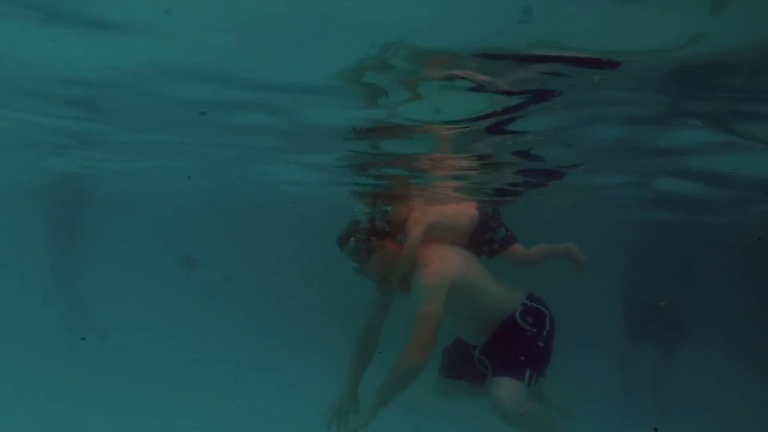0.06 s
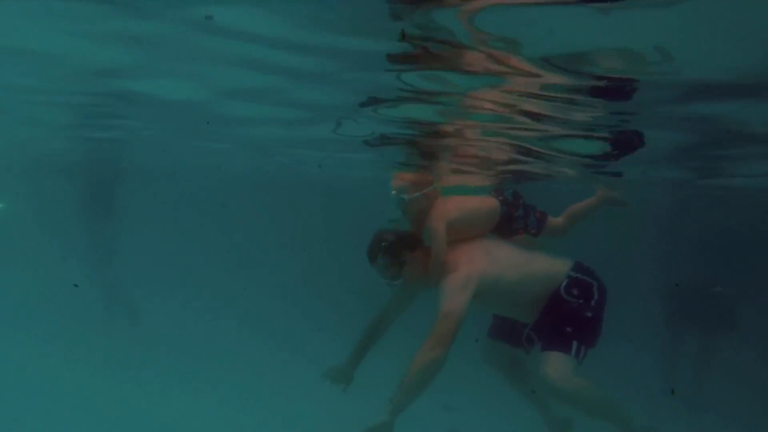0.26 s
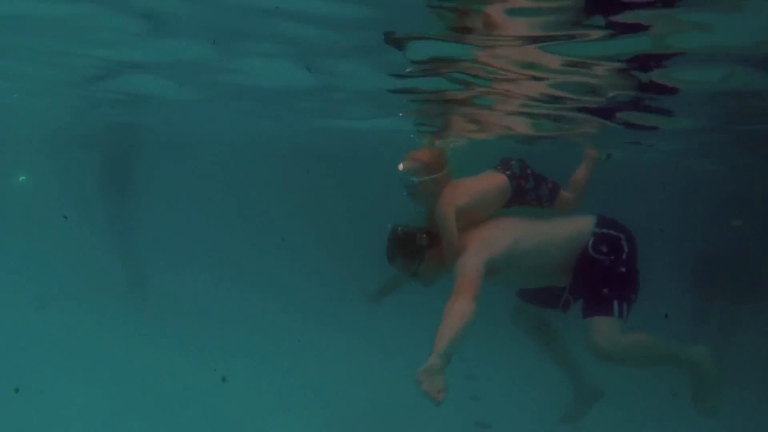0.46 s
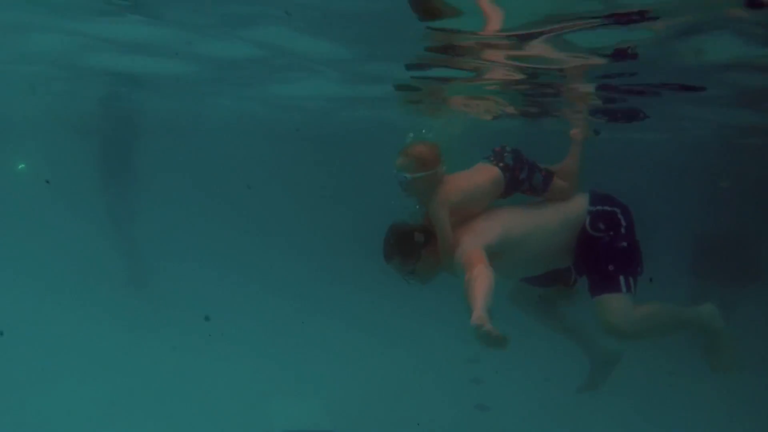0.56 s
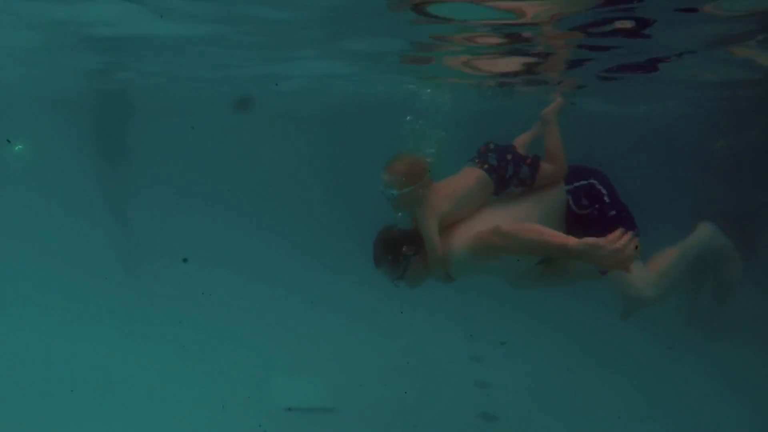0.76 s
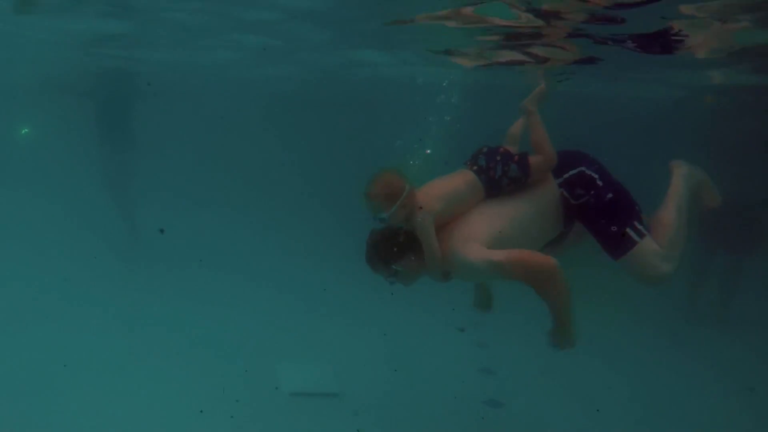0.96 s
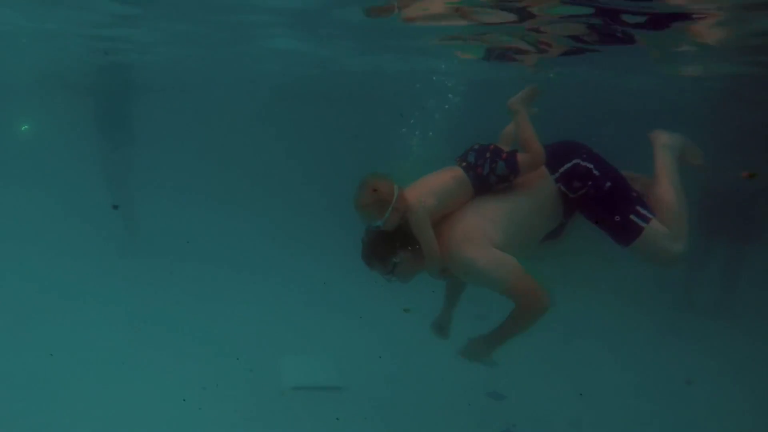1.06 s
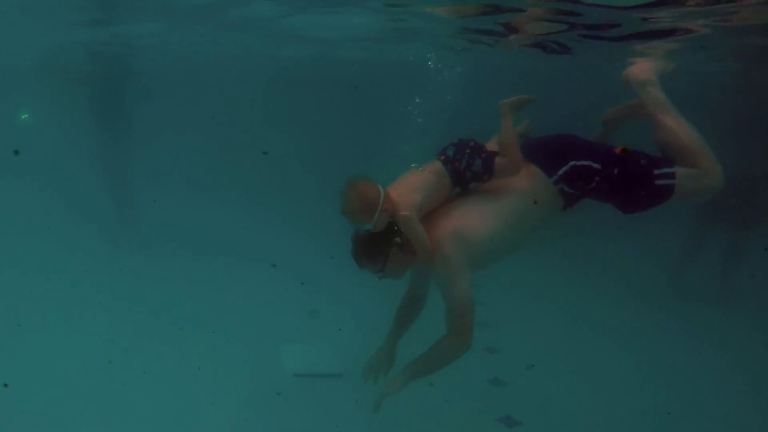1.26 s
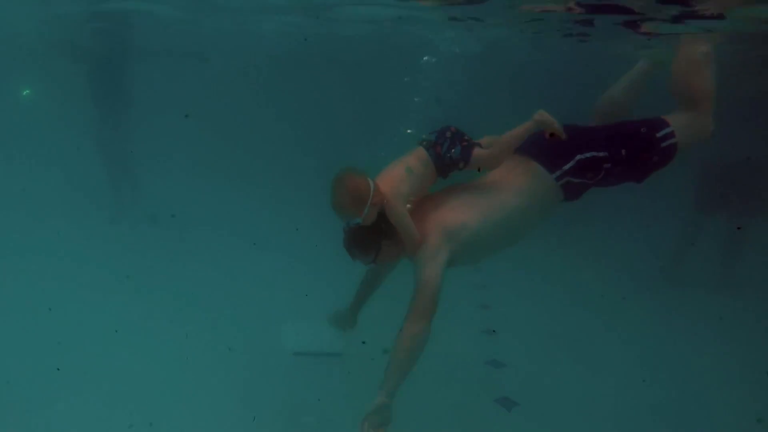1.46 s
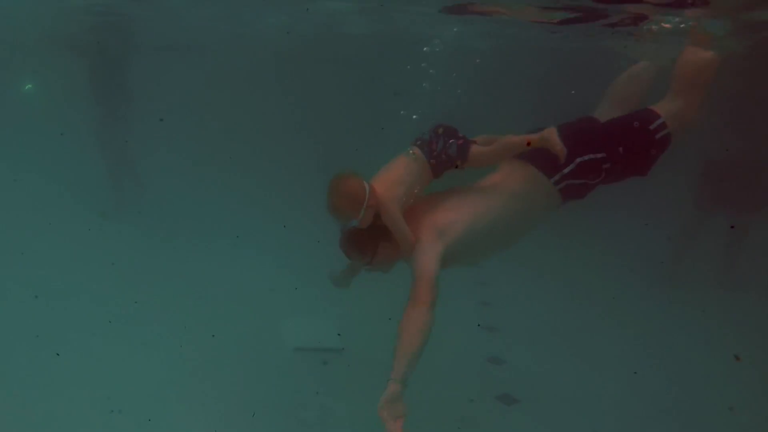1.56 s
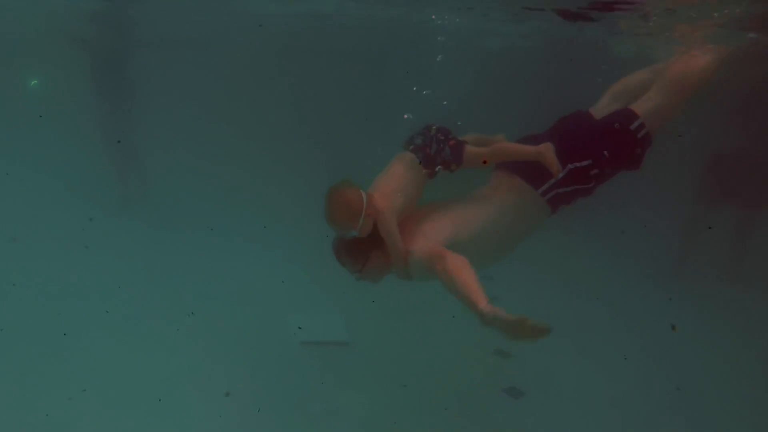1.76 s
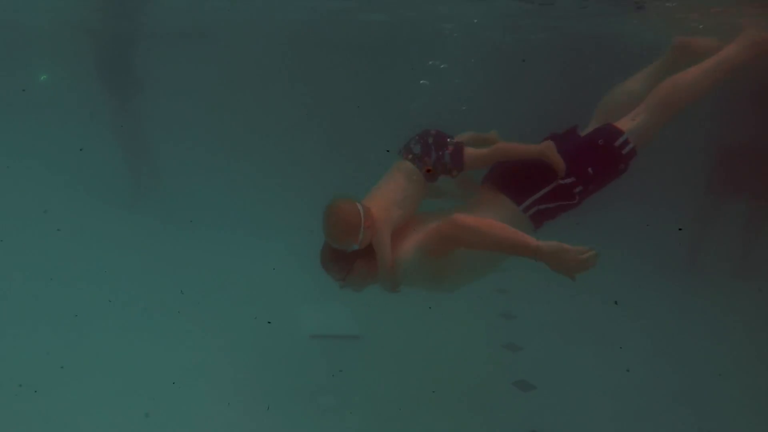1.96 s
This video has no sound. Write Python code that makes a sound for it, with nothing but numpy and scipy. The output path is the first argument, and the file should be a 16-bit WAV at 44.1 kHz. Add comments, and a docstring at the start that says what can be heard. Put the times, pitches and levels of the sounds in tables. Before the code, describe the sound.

Muffled underwater pool gurgling as swimmers pass, with deep rumble, glugging bubbles and one sharp click

```python
"""Two swimmers pass a sealed microphone housing under water in a pool. Stirred water rumbles throughout,
bubbles gurgle in the housing's hollow and fine ones fizz, all as filtered noise or random swarms.
Early on a large pocket of air throbs, a decaying sine like the nearer glugs and plinks that run on.
At 0.5 s something hard ticks sharply on the housing (noise crack, ringing modes), then weakly again.
Fainter contacts follow; near 1.6 s the fizz is strongest and a loud glug sounds."""
import sys
import numpy as np
from scipy import signal
from scipy.fft import rfft, irfft, next_fast_len
from scipy.io import wavfile

SR = 44100
rng = np.random.default_rng(int(sys.argv[2]) if len(sys.argv) > 2 else 0)


def waveform_to_disk(signal):
    """Save audio, clipped to [-1, 1], as 16-bit WAV at the path in sys.argv[1]."""
    frames = np.transpose(np.atleast_2d(signal))
    scaled = np.clip(frames, -1, 1) * 32767
    samples = np.round(scaled).astype(np.int16)
    wavfile.write(sys.argv[1], SR, samples)


N = 88861


def amp(db):
    """Decibels to gain."""
    return 10 ** (np.asarray(db) / 20)


def unit(x):
    """Scale to rms 1."""
    return x / np.sqrt(np.mean(x ** 2) + 1e-20)


def curve(rows):
    """Interpolate (seconds, value) rows to one value per sample."""
    return np.interp(np.arange(N) / SR, *np.transpose(rows))


def colour(x, points):
    """Causal minimum-phase filter through (Hz, dB) points, by folding the cepstrum."""
    m = 2 * next_fast_len(len(x) // 2 + 8192)
    hz, db = np.transpose(points)
    log_hz = np.log(np.fft.rfftfreq(m, 1 / SR) + 1)
    gain = amp(np.interp(log_hz, np.log(hz), db))
    cepstrum = irfft(np.log(gain), m)
    cepstrum[1:m // 2] *= 2
    cepstrum[m // 2 + 1:] = 0
    response = np.exp(rfft(cepstrum))
    return irfft(rfft(x, m) * response, m)[:len(x)]


def coloured_noise(size, points):
    """White noise filtered through (Hz, dB) points, at rms 1."""
    return unit(colour(rng.standard_normal(size), points))


def add(out, start_s, sound):
    """Mix a sound in at start_s, cut at the end of out."""
    i = max(0, round(start_s * SR))
    out[i:i + len(sound)] += sound[:max(0, N - i)]


def bubble(hz, swell_s, t60_s):
    """A pulsating volume of air: it swells, then dies away at a fixed pitch."""
    t = np.arange(SR // 2) / SR
    swell = np.sin(np.pi / 2 * np.minimum(t / swell_s, 1))
    decay = amp(-60 * np.maximum(t - swell_s, 0) / t60_s)
    return swell * decay * np.sin(2 * np.pi * hz * t)


def swarm(count, hz, spread, cycles, scatter_db, size, rise=0):
    """Bubbles of random time, pitch and strength; each falls 60 dB in `cycles` and climbs if rise > 0."""
    when = rng.random(count)
    pitch = rng.standard_normal(count)
    strength = np.minimum(rng.exponential(size=count), 3)
    bubble_hz = np.minimum(hz * np.exp(spread * pitch), SR / 3)
    turns = bubble_hz[:, None] * np.arange(size) / SR
    decay = amp(scatter_db * strength[:, None] - 60 * turns / cycles)
    onset = 1 - np.exp(-turns)
    waves = decay * onset * np.sin(2 * np.pi * turns * (1 + rise * turns / cycles))
    at = (when * N).astype(int)[:, None] + np.arange(size)
    return unit(np.bincount(at.ravel() % N, waves.ravel(), N))  # tails wrap to the start


def near_bubbles():
    """Air volumes pulsating close by: throbs and glugs muffled by the housing's hollow, and clear plinks."""
    # Deep air pockets and eddies. Each row: start in seconds, pitch in Hz, level in dB before
    # muffling, swell in seconds, t60 in seconds.
    throbs = [(0.084, 83.8, -30.5, 0.079, 0.38), (0.102, 141, -39.5, 0.0049, 0.081),
              (0.469, 43.3, -34.5, 0.046, 0.48), (0.918, 44.2, -34.5, 0.024, 0.28),
              (0.991, 25.5, -33.5, 0.067, 0.28), (1.11, 56.3, -35, 0.0223, 0.21),
              (1.653, 52.6, -36, 0.018, 0.062), (1.881, 47, -31, 0.023, 0.059)]
    # Mid-sized bubbles. Each row: as for the throbs.
    glugs = [(.048, 550, -37, 0.017, 0.053), (.139, 570, -37, 0.0031, 0.067),
             (.172, 609, -33, 0.0015, 0.054), (0.203, 590, -40, 0.002, 0.024),
             (.306, 577, -39.5, 0.011, 0.035), (.484, 615, -31, 0.0022, 0.026),
             (.570, 595, -36, 0.0078, 0.075), (.599, 578, -33, 0.0014, 0.085),
             (0.67, 550, -31, 0.0017, 0.034), (.709, 574, -33.5, 0.003, 0.047),
             (.739, 514, -28.5, 0.003, 0.017), (.858, 610, -37.5, 0.0021, 0.019),
             (.909, 599, -30, 0.0095, 0.067), (0.963, 561, -33.5, 0.00098, 0.1),
             (1.094, 610, -34, 0.0015, 0.05), (1.146, 454, -39.5, 0.0095, 0.09),
             (1.227, 556, -30.5, 0.0035, 0.035), (1.640, 553, -27, 0.0048, 0.13),
             (1.672, 544, -35, 0.0053, 0.079), (1.706, 589, -37, 0.0083, 0.061)]
    # Small bubbles. Each row: start in seconds, pitch in Hz, level in dB.
    plinks = [(0.106, 3640, -46), (.367, 2330, -46), (0.407, 2730, -45.5), (0.476, 1410, -51),
              (.676, 3930, -47), (0.727, 1780, -47.5), (0.771, 3380, -50), (0.787, 6800, -54.5),
              (.983, 3370, -53), (1.014, 3850, -43), (1.204, 2330, -50.5), (1.456, 3220, -51),
              (1.458, 2730, -45.5), (1.479, 2280, -49), (1.514, 2430, -46), (1.6, 2400, -45.5),
              (1.613, 1380, -49), (1.638, 1760, -46.5), (1.660, 10000, -58.5), (1.662, 3850, -49),
              (1.677, 1730, -52), (1.719, 3220, -46), (1.881, 1840, -42.5), (1.938, 2430, -41)]
    hollow_edge_hz = 704
    plink_swell_s, plink_t60_s = 0.0015, 0.024

    out = np.zeros(N)
    for start_s, hz, db, swell_s, t60_s in throbs + glugs:
        add(out, start_s, amp(db) * bubble(hz, swell_s, t60_s))
    lowpass = signal.butter(8, hollow_edge_hz, fs=SR, output="sos")
    out = signal.sosfiltfilt(lowpass, out)
    for start_s, hz, db in plinks:
        add(out, start_s, amp(db) * bubble(hz, plink_swell_s, plink_t60_s))
    return out


def clicks():
    """Hard contacts crack and ring the housing, low modes building up last; the pool echoes diffusely."""
    # Contacts. Each row: start in seconds, level in dB, crack level in dB relative to that.
    contacts = [(.5164, -20.5, -15), (.5405, -42, -0.5), (.7065, -54, 1), (1.697, -55, 1),
                (1.9005, -44, -9)]
    # Housing modes. Each row: frequency in Hz, relative level in dB, t60 in seconds.
    modes = [(600, -5, 0.018), (1360, -7, 0.026), (1820, -5, 0.016), (2406, -6, 0.016), (2537, -2, 0.017),
             (3320, -6, 0.028), (3500, 0.5, 0.014), (3790, 3, 0.019), (4600, -8.5, 0.015),
             (5470, -21, 0.034), (7250, -14.5, 0.013), (11280, -40, 0.02)]
    # Crack spectrum. Each row: frequency in Hz, relative level in dB.
    crack_tone = [(900, -5), (2000, -10), (3800, -3), (6000, -5), (10000, -5), (12000, -17), (16000, -12)]
    # Echo spectrum. Each row: frequency in Hz, relative level in dB.
    pool_tone = [(700, -26), (1400, -1.5), (2500, 2), (4200, 0.5), (5400, -9.5), (10000, -24), (13000, -30)]
    crack_t60_s, ring_up_cycles = 0.017, 1.3
    pool_db, pool_swell_s = -23, 0.014

    out = np.zeros(N)
    t = np.arange(SR // 5) / SR
    pool_swell = (t / pool_swell_s * np.exp(1 - t / pool_swell_s)) ** 2
    for start_s, db, crack_db in contacts:
        ring = np.zeros(len(t))
        for hz, mode_db, t60_s in modes:
            decay = amp(mode_db - 60 * t / t60_s)
            build_up = 1 - np.exp(-(t * hz / ring_up_cycles) ** 2)
            ring += decay * build_up * np.sin(2 * np.pi * (hz * t + rng.random()))
        crack = amp(crack_db - 60 * t / crack_t60_s) * coloured_noise(len(t), crack_tone)
        echoes = amp(pool_db) * pool_swell * coloured_noise(len(t), pool_tone)
        add(out, start_s, amp(db) * (ring + crack + echoes))
    return out


def gurgle():
    """Churned bubbles, each a short strand rising in pitch, heard through the hollow of the housing."""
    # Churning of the bubbles. Each row: time in seconds, level in dB.
    churn_level = [(0, -45), (.12, -50.5), (.33, -44), (.41, -50.5), (.58, -47.5), (.76, -46.5), (.88, -48),
                   (1.03, -50), (1.13, -46.5), (1.25, -47), (1.3, -50), (1.45, -54.5), (1.52, -46.5),
                   (1.6, -48.5), (1.71, -46), (1.82, -50.5), (2.01, -52)]
    # Hollow resonance. Each row: frequency in Hz, relative gain in dB.
    hollow_tone = [(150, -39.5), (300, -21.5), (380, -12.5), (480, -10.5), (555, -2.5), (610, -0.5),
                   (670, -7.5), (760, -29.5), (1000, -47), (2000, -70)]
    bubbles = swarm(count=800, hz=510, spread=0.3, cycles=22, scatter_db=1.2, size=2600, rise=0.1)
    return amp(curve(churn_level)) * unit(colour(bubbles, hollow_tone))


def fizz():
    """Fine bubbles and hiss through the shell's resonances, with fewer, longer-ringing blips closer by."""
    # Strength of the fizz. Each row: time in seconds, level in dB.
    fizz_level = [(0, -60), (.25, -59.5), (.45, -58.5), (.7, -59), (.92, -56), (1.1, -61.5), (1.4, -63),
                  (1.52, -60), (1.62, -53.5), (1.72, -54), (1.83, -56.5), (2.01, -58.5)]
    # Shell resonances. Each row: frequency in Hz, relative gain in dB.
    shell_tone = [(700, -51), (1150, -14.5), (1370, 4.5), (1600, -14), (1850, 1.5), (2070, -37.5),
                  (2370, 7), (2900, -20), (3300, 1.5), (3520, -8), (3830, 8), (4400, 0), (4800, -7.5),
                  (5400, 0.5), (6000, -12), (7300, -21), (9300, -35), (10200, 0.5), (11000, -75),
                  (16000, -33)]
    # Filter on the blips. Each row: frequency in Hz, relative gain in dB.
    blip_tone = [(900, -31), (1400, 1), (4200, -1.5), (6000, -8), (12000, -17)]
    hiss_db, blip_db = -8, -5.5  # hiss re bubble swarm, blips re fine fizz

    bubbles = swarm(count=3000, hz=3450, spread=0.692, cycles=11, scatter_db=2.2, size=600)
    blips = swarm(count=600, hz=2600, spread=0.45, cycles=40, scatter_db=2.6, size=1200)
    hiss = amp(hiss_db) * rng.standard_normal(N)
    fine = unit(colour(bubbles + hiss, shell_tone))
    near = amp(blip_db) * unit(colour(blips, blip_tone))
    return amp(curve(fizz_level)) * unit(fine + near)


def rumble():
    """Stirred water presses slowly on the housing, with a low murmur, over the even wash of the pool."""
    # Slow pressure swings. Each row: time in seconds, level in dB before the lift.
    surge_level = [(0, -42.5), (.2, -46.5), (.33, -49.5), (.42, -42), (.6, -44.5), (.7, -51.5), (.78, -47),
                   (.88, -46.5), (1.05, -44.5), (1.2, -42), (1.33, -47), (1.44, -46.5), (1.55, -43.5),
                   (1.7, -45), (1.83, -44.5), (2.01, -49.5)]
    # Surge spectrum. Each row: frequency in Hz, relative level in dB.
    surge_tone = [(10, -3), (20, 4.5), (28, -1.5), (45, -3.5), (62, -3.5), (85, -12.5), (120, -21.5),
                  (200, -22.5), (400, -74.5)]
    # Murmur near 180 Hz. Each row: time in seconds, level in dB.
    murmur_level = [(0, -58.5), (.11, -58), (.23, -55), (.35, -54), (.58, -61.5), (.75, -50.5), (.9, -58.5),
                    (1.25, -60.5), (1.42, -61.5), (1.75, -64.5), (1.9, -52), (2.01, -60)]
    # Murmur spectrum. Each row: frequency in Hz, relative level in dB.
    murmur_tone = [(50, -34), (110, -2), (190, -5.5), (250, -12.5), (400, -42.5), (900, -53)]
    # Wash spectrum. Each row: frequency in Hz, relative level in dB.
    wash_tone = [(40, 5), (190, -12.5), (270, -5.5), (400, -9.5), (800, -11), (1100, -15.5), (3000, -18.5),
                 (6000, -23), (11000, -31.5), (15000, -32.5)]
    surge_lift_db, wash_db = 1.0, -57

    surge = amp(curve(surge_level) + surge_lift_db) * coloured_noise(N, surge_tone)
    murmur = amp(curve(murmur_level)) * coloured_noise(N, murmur_tone)
    wash = amp(wash_db) * coloured_noise(N, wash_tone)
    return surge + murmur + wash


def scene():
    """Everything reaches one microphone inside the housing."""
    mix = rumble() + gurgle() + fizz() + near_bubbles() + clicks()
    return mix[None]


def record(dry):
    """The microphone channel keeps nothing at or above its band limit."""
    top_hz = 15500
    m = next_fast_len(N + SR // 2)
    in_band = np.fft.rfftfreq(m, 1 / SR) < top_hz
    return irfft(rfft(dry, m) * in_band, m)[..., :N]


dry = scene()
out = record(dry)
waveform_to_disk(out)
```